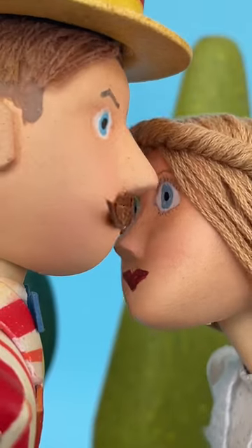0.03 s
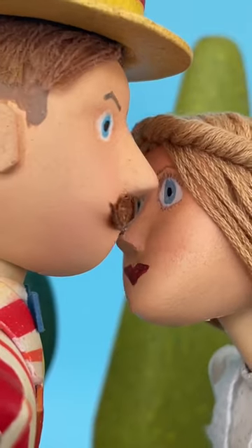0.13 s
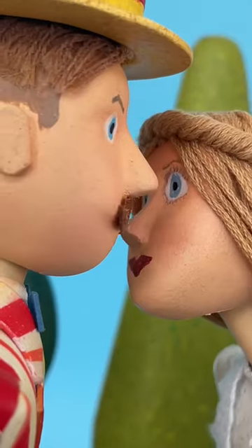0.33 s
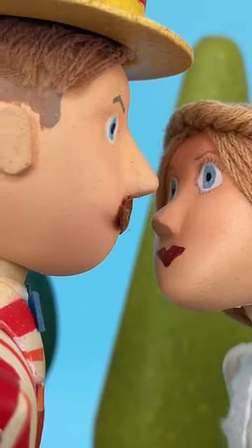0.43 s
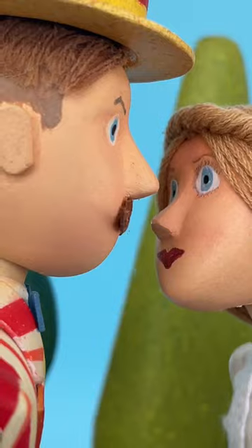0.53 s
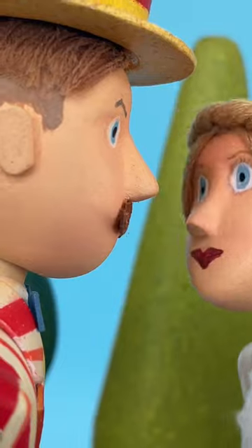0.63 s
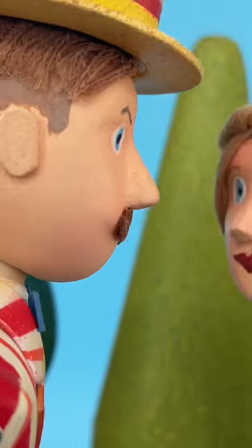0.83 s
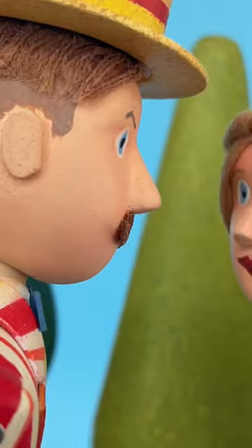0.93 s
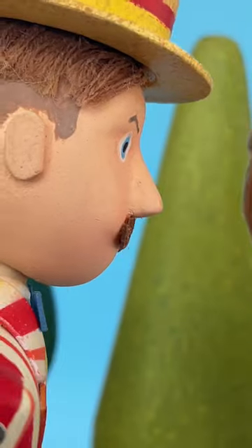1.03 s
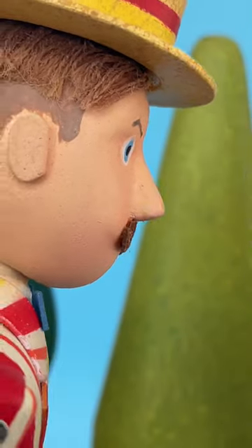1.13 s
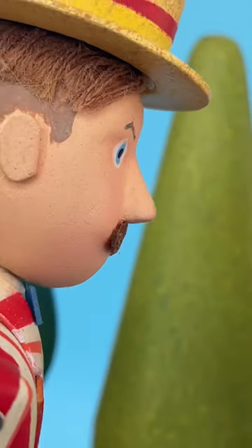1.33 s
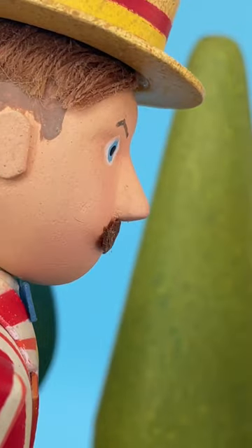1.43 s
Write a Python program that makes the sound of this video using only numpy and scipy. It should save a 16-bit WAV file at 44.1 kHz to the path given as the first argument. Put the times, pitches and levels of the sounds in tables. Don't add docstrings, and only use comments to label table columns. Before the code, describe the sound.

A small wooden crank toy clacks close by over faint low air noise in a quiet room. Light ticks and knocks begin around 0.1 s; at 0.25 s a hard push brings a piercing high squeak, rubbing and clatter. Hollow knocks continue, with lower squeaks and a sharp clack near 0.7 s. It eases around 0.8 s, then rattles strongly again near 1.2 s, ending in sparse ticks with short echo.

```python
import sys
import numpy as np
from scipy import signal
from scipy.fft import rfft, irfft
from scipy.io import wavfile
from scipy.ndimage import uniform_filter1d

SR = 44100
rng = np.random.default_rng(int(sys.argv[2]) if len(sys.argv) > 2 else 0)


def natural_amplitude(level_db):
    exponent = np.asarray(level_db, float) / 20
    return 10 ** exponent


def log_audio(samples):
    frames = np.atleast_2d(samples).T
    limited = np.clip(frames, -1, 1)
    pcm = np.round(limited * 32767).astype(np.int16)
    wavfile.write(sys.argv[1], SR, pcm)


N = 66150

# pitch_hz [Hz], level_db [dB per Hz]
AIR_SPECTRUM = [(28, -25), (50, -2.5), (140, 5.5), (320, -2.5), (1000, -5.5), (3000, -25.5), (5000, -55),
                (12000, -36.5), (15000, -56)]
# pitch_hz [Hz], level_db [dB per Hz]
RUB_SPECTRUM = [(40, -4.5), (130, 1.5), (350, -1.5), (1000, -16.5), (1500, -17), (4000, -19), (7500, -31),
                (13000, -59)]
# time_s [s], level_db [dB]
CRANK_EFFORT = [(0, -72.5), (.055, -76), (0.106, -65), (0.223, -67.5), (0.261, -56.5), (.45, -65.5),
                (.52, -63), (0.601, -63.5), (0.697, -61), (.735, -67), (0.788, -75.5), (.86, -77),
                (.92, -75), (0.952, -69), (1.15, -67), (1.2, -59), (1.31, -67.5), (1.5, -68)]
# start_s [s], level_db [peak dB], pitch_hz [Hz], t60_s [s]
CASE_BOOMS = [(0.106, -49.5, 337, .15), (0.2, -45.5, 327.3, 0.18), (0.261, -53.5, 206.6, 0.26),
              (0.301, -50, 294, 0.32), (0.378, -41, 110, 0.082), (0.403, -48.5, 331, 0.17),
              (0.419, -51, 52.1, 0.74), (.54, -52, 307, 0.25), (0.56, -44.5, 141.4, 0.27),
              (0.75, -52.5, 404.4, 0.25), (0.799, -57, 246.8, .4), (.85, -54, 309, 0.15),
              (.965, -47.5, 322.6, 0.24), (1.028, -51, 294.4, 0.077), (1.149, -56, 127.5, 1),
              (1.191, -48, 292, 0.12)]
# peak_s [s], level_db [peak dB], pitch_hz [Hz], rise_s [s], t60_s [s]
PIVOT_SQUEAKS = [(.2420, -20.5, 4165, 0.0026, 0.013), (0.2458, -29.5, 4200, 0.0008, 0.0083),
                 (0.2473, -32, 3450, 0.00068, 0.011), (.3135, -47, 3400, 0.0011, 0.0094),
                 (.2560, -38, 2000, 0.00092, 0.013), (.3065, -39.5, 3800, 0.0014, 0.0097),
                 (.3105, -31.5, 3546, 0.0011, 0.019), (.5130, -52, 2047, 0.00061, 0.05),
                 (.6915, -30.5, 2065, 0.00079, 0.015), (.6968, -31.5, 2063, 0.0022, 0.025),
                 (1.034, -52.5, 3130, 0.0018, 0.14), (.012, -63.5, 3910, 0.0022, 0.2),
                 (1.218, -43, 2186, 0.0014, 0.016)]
# start_s [s], level_db [peak dB], pitch_hz [Hz], bright_edge_db [dB]
PIN_TICKS = [(0.058, -52.5, 3100, -39), (0.0608, -45.5, 4100, 24), (.07, -45, 2430, -28),
             (0.1029, -38, 2480, -21), (0.25, -35.5, 6200, -31), (0.272, -30.5, 3360, -1.5),
             (0.369, -34.5, 5800, 9.5), (0.383, -49, 3540, -17), (0.4699, -40.5, 4220, -10),
             (0.5683, -62, 5200, 21), (0.594, -49.5, 3400, -38), (0.606, -40, 3540, -6),
             (0.637, -48.5, 2600, -6), (0.65, -43, 5250, -37), (0.691, -43.5, 3530, 3.5),
             (0.869, -58.5, 4500, 8.5), (.889, -53.5, 3950, 23), (0.9364, -39, 2820, -1.5),
             (0.98, -50, 3500, -19), (0.9931, -45.5, 2800, -22), (1.031, -55.5, 2510, -24),
             (1.0938, -48.5, 3180, -26), (1.1514, -53, 2700, -22), (1.1772, -29, 3720, -2),
             (1.215, -38.5, 2980, -30), (1.27, -41.5, 3030, -1.5), (1.3366, -35.5, 3070, -7),
             (1.476, -61, 2800, -22.5), (1.4966, -50.5, 2330, -4)]
# pitch_hz [Hz], level_db [dB]
FRAME_NOTES = [(600, -4), (700, -3.5), (835, -3), (960, -5), (1130, -4), (1630, -5.5), (1910, -2),
               (2250, -3), (2900, -6.5), (3400, -28), (4200, -26)]
# start_s [s], level_db [peak dB], pitch_hz [Hz], t60_s [s]
LIGHTER_KNOCKS = [(.2725, -42, 890, 0.019), (.279, -45, 716, 0.017), (.45, -60, 750, 0.027),
                  (.513, -58, 950, .03), (.6445, -38.5, 2090, 0.011), (.651, -43.5, 1460, 0.012),
                  (.709, -47, 1025, 0.007), (.7135, -40, 1080, 0.0082), (.725, -40, 526, 0.017),
                  (.75, -51.5, 412, 0.084), (1.475, -49.5, 1095, .05), (1.4965, -44, 743, 0.059),
                  (.468, -48, 1597, 0.054), (1.155, -55, 1440, 0.027), (.839, -54, 1018, 0.055),
                  (1.184, -60.5, 927, 0.023), (1.2115, -45, 1520, 0.027), (1.2205, -40.5, 850, 0.011),
                  (1.229, -50, 910, 0.034), (1.265, -49, 745, .02), (1.271, -48, 770, 0.013),
                  (.163, -52.5, 606, 0.018), (.098, -46.5, 950, 0.022), (.209, -55, 1980, .02),
                  (1.178, -35.5, 1290, 0.017), (.5365, -42.5, 1633, 0.017), (1.217, -40, 600, .02)]
# start_s [s], level_db [peak dB], pitch_hz [Hz], t60_s [s]
CAM_KNOCKS = [(0.103, -41, 2300, 0.076), (0.193, -47, 640, 0.033), (0.208, -44, 640, 0.12),
              (0.244, -37, 848, 0.062), (0.252, -41, 857, 0.034), (0.269, -31.5, 710, 0.021),
              (0.295, -44.5, 2170, 0.031), (0.36, -44.5, 826, 0.082), (0.395, -34.5, 913, 0.012),
              (0.468, -47.5, 752, 0.059), (0.5365, -34, 906, 0.018), (0.541, -43, 920, 0.0057),
              (0.593, -45.5, 1360, 0.052), (0.608, -38.5, 2230, 0.027), (0.647, -43.5, 708, 0.055),
              (0.7030, -31.5, 900, 0.011), (0.73, -47, 776, 0.015), (0.885, -54, 1856, 0.047),
              (0.935, -42.5, 913, 0.023), (0.959, -43, 892, 0.08), (0.968, -46.5, 653, 0.028),
              (1.069, -47, 878, 0.1), (1.116, -50, 1175, 0.084), (1.154, -42, 885, 0.069),
              (1.177, -34, 950, 0.014), (1.214, -45.5, 880, 0.041), (1.336, -39.5, 733, 0.021),
              (1.461, -46, 997, 0.021)]
# pitch_hz [Hz], lead_rad [radians]
PORT_LEAD = [(300, 0), (2600, .55), (4200, 1), (5100, 0), (7150, 3.0), (8150, 3.3), (11100, 2 * np.pi),
             (14200, 3 * np.pi), (16000, 3.5 * np.pi)]
# pitch_hz [Hz], level_db [dB]
PORT_LEVEL = [(100, -.4), (600, -4), (1400, 0)]
# pitch_hz [Hz], likeness [0-1]
PORT_LIKENESS = [(130, .998), (600, .5), (1500, .7), (3000, .98), (7000, .994), (8200, .994), (10000, .95)]
# pitch_hz [Hz], level_db [dB]
MIC_TONE = [(22, -17.5), (45, -1), (6000, -0.5), (12500, 1), (14500, -11.5)]


def along(table):
    t = np.array(table, float)
    hz = np.arange(N // 2 + 1) * SR / N
    return np.interp(np.log(hz + 1), np.log(t[:, 0]), t[:, 1])


def colour(x, table):
    y = irfft(rfft(x) * natural_amplitude(along(table)), N)
    return y / np.std(y)


def add(out, start_s, x, level_db):
    i = int(start_s * SR)
    x = x[max(-i, 0):N - i]
    out[max(i, 0):max(i, 0) + len(x)] += x * natural_amplitude(level_db) / np.abs(x).max()


def fade(t, t60_s):
    return np.exp(-np.log(1000) * t / t60_s)


def band(x, hz, wide):
    wide = max(wide, 1.02)
    edges = [hz / wide, min(hz * wide, SR * .45)]
    return signal.sosfilt(signal.butter(2, edges, "band", fs=SR, output="sos"), x)


def quiet_air():
    return natural_amplitude(-65.5) * colour(rng.standard_normal(N), AIR_SPECTRUM)


def room_echo(x):
    bass_t60_s, treble_t60_s = 0.35, 0.33
    bass_db, treble_db = -8.5, -9
    t = np.arange(N // 2) / SR
    bounces = rng.standard_normal(len(t)) * np.minimum(t / 0.0023, 1)
    bass = natural_amplitude(bass_db) * band(bounces, 350, 5.35) * fade(t, bass_t60_s)
    treble = natural_amplitude(treble_db) * band(bounces, 11000, 2.3) * fade(t, treble_t60_s)
    return signal.fftconvolve(x, (bass + treble) / 30)[:N]


def shaft_rub():
    rub_db, grains_per_s, grain_spread_db = 3, 4000, 2.5
    surge_db, treble_per_effort = 1.2, 1.29
    chance, size = rng.random((2, N))
    direction = np.sign(size * 977 % 1 - .5)
    grains = (chance < grains_per_s / SR) * natural_amplitude(-grain_spread_db * np.log(size + 0.0002)) * direction
    x = colour(grains, RUB_SPECTRUM)
    x = x / np.std(band(x, 1500, 5.4))

    surge = uniform_filter1d(rng.standard_normal(N), size=500)
    surge = uniform_filter1d(surge, size=500) * 27 * surge_db

    table = np.array(CRANK_EFFORT)
    effort_db = np.interp(np.arange(N) / SR, table[:, 0], table[:, 1])
    hardest_db = table[:, 1].max()
    low = signal.sosfiltfilt(signal.butter(2, 1300, fs=SR, output="sos"), x)
    treble = x - low
    treble_db = hardest_db + treble_per_effort * (effort_db - hardest_db)
    return natural_amplitude(rub_db + surge) * (low * natural_amplitude(effort_db) + treble * natural_amplitude(treble_db))


def case_booms():
    rise_s = 0.0034
    out, t = np.zeros(N), np.arange(16384) / SR
    for start_s, level_db, hz, t60_s in CASE_BOOMS:
        wobble = uniform_filter1d(rng.standard_normal(len(t)), size=600) * 25
        tone = np.sin(2 * np.pi * hz * t + 0.59 * wobble)
        add(out, start_s, tone * (1 - np.exp(-t / rise_s)) * fade(t, t60_s), level_db)
    return out


def pivot_squeaks():
    sag_per_s, grit_db, octave_db = 24, -17.5, -24.5
    out, t = np.zeros(N), np.arange(-512, 4096) / SR
    for peak_s, level_db, hz, rise_s, t60_s in PIVOT_SQUEAKS:
        noise = rng.standard_normal((2, len(t)))
        sags = (hz > 3300) * (t60_s < .1)
        pitch = hz * (1 - sag_per_s * 0.0029 * np.tanh(t / 0.0018) * sags)
        phase = 2 * np.pi * np.cumsum(pitch) / SR

        swell = np.exp(-np.abs(t / rise_s) ** 2.44)
        decay = fade(np.hypot(t, rise_s / 3) - rise_s / 3, t60_s)
        loudness = np.where(t < 0, swell, decay)

        flutter = 1 + (t60_s > .06) * 6.0 * uniform_filter1d(noise[1], size=200)
        grit = natural_amplitude(grit_db) * band(noise[0], 0.94 * hz, 1.8) * (t > 0)
        song = flutter * np.sin(phase) + natural_amplitude(octave_db) * np.sin(2 * phase) + grit
        add(out, peak_s + t[0], loudness * song, level_db)
    return out


def pin_ticks():
    ring_t60_s, tip_db = 0.043, -9.5
    out, t = np.zeros(N), np.arange(2048) / SR
    for start_s, level_db, hz, edge_db in PIN_TICKS:
        noise = rng.standard_normal((3, len(t)))
        noise[:, 20] += 6
        tip = natural_amplitude(edge_db + tip_db) * band(noise[2], 15000, 1.076) * fade(t, 0.0076)
        body = band(noise[0], hz, 1.303) + natural_amplitude(-7) * band(noise[1], 6050, 1.277)
        edge = natural_amplitude(edge_db) * band(noise[2], 7380, 1.108) * fade(t, 1.2 * ring_t60_s)
        x = tip + body * fade(t, ring_t60_s) + edge
        add(out, start_s, x * np.minimum(t / 0.00046, 1), level_db)
    return out


def wooden_knocks(table):
    own_note_db, crack_db, rattle_db, snap_db = 1, -12.5, -4.5, 3
    sharp_start = 0.46
    scatter_db, frame_ring, frame_t60_max_s = 2.5, 1.86, 0.049
    out, t = np.zeros(N), np.arange(4096) / SR
    for start_s, level_db, hz, t60_s in table:
        chance = rng.standard_normal((len(FRAME_NOTES), 2))
        noise = rng.standard_normal((2, len(t)))
        pitch = hz * (1 + sharp_start * fade(t, 0.0082))
        x = natural_amplitude(own_note_db) * np.sin(2 * np.pi * np.cumsum(pitch) / SR) * fade(t, t60_s)

        frame_t60_s = min(frame_ring * t60_s, frame_t60_max_s)
        for (note_hz, note_db), (uneven, detune) in zip(FRAME_NOTES, chance):
            db = note_db + scatter_db * uneven - 4.0 * abs(np.log2(note_hz / hz))
            note = np.sin(2 * np.pi * note_hz * (1 + 0.041 * detune) * t + uneven)
            x = x + natural_amplitude(db) * note * fade(t, frame_t60_s * np.sqrt(1000 / note_hz))

        crack = natural_amplitude(crack_db) * band(noise[0], 1.01 * hz, 2.4) * fade(t, t60_s)
        rattle = natural_amplitude(rattle_db) * band(noise[1], 1.15 * hz, 1.73) * fade(t, 4 * t60_s)
        click = 1. * (t == t[20])
        snap = natural_amplitude(snap_db) * band(click, 2.7 * hz, 1.3)
        add(out, start_s, (x + crack + rattle) * np.minimum(t / 0.0017, 1) + snap, level_db)
    return out


def scene():
    squeaks = pivot_squeaks()
    rest = shaft_rub() + case_booms() + pin_ticks()
    rest = rest + wooden_knocks(LIGHTER_KNOCKS) + wooden_knocks(CAM_KNOCKS)
    toy = (rest + squeaks) * np.minimum(np.arange(N, 0, -1) / 50, 1)
    to_room = rest + natural_amplitude(-4.5) * squeaks

    shared = rfft(toy + room_echo(to_room) + quiet_air())
    differing = rfft(room_echo(to_room) + quiet_air())
    spread = np.sqrt(1 - np.clip(along(PORT_LIKENESS), 0, 1)) * differing
    half = natural_amplitude(along(PORT_LEVEL) / 2) * np.exp(.5j * along(PORT_LEAD))
    left = irfft((shared + spread) * half, N)
    right = irfft((shared - spread) / half, N)
    return np.array([left, right])


def top_cut(x):
    return signal.sosfilt(signal.butter(12, 15700, fs=SR, output="sos"), x)


def record(dry):
    top_hz = 15700
    heard = irfft(rfft(dry) * natural_amplitude(along(MIC_TONE)), N)
    mix = signal.sosfilt(signal.ellip(8, .2, 70, top_hz, fs=SR, output="sos"), heard)
    return top_cut(mix)


dry = scene()
out = record(dry)
log_audio(out)
```